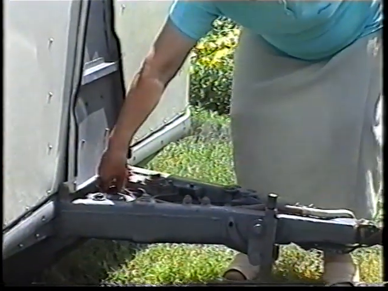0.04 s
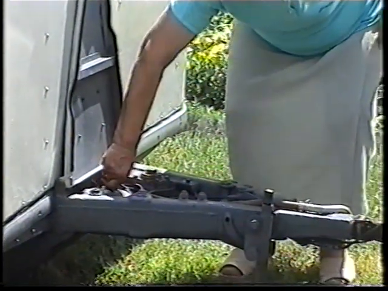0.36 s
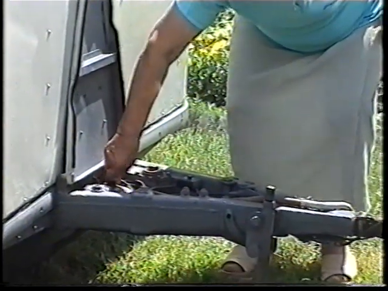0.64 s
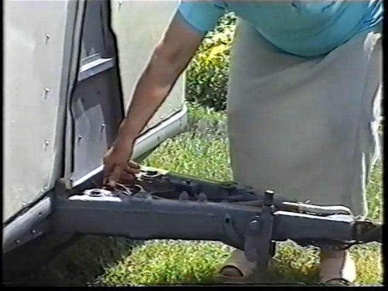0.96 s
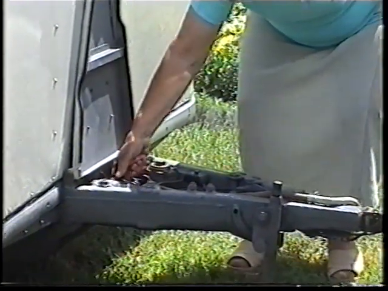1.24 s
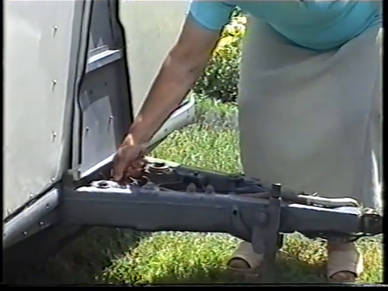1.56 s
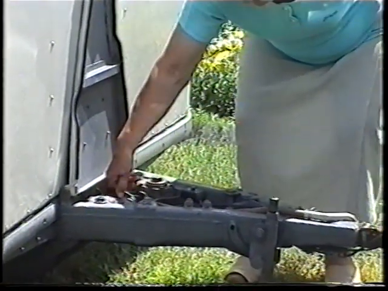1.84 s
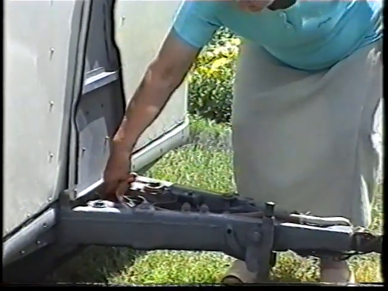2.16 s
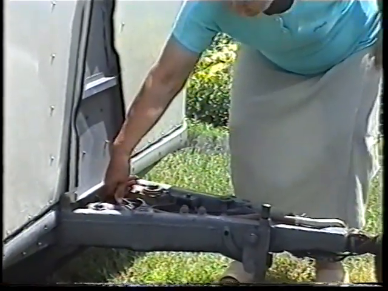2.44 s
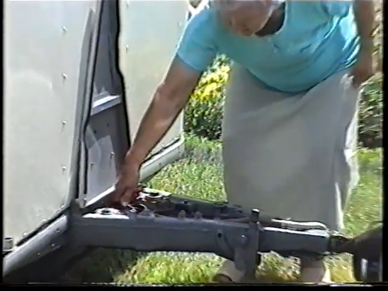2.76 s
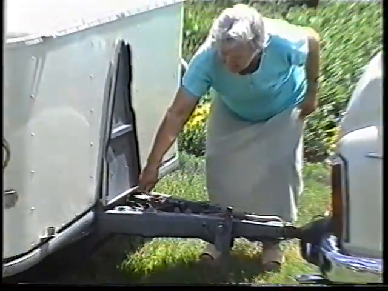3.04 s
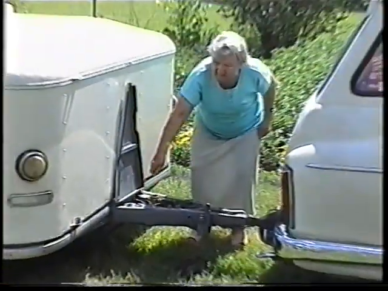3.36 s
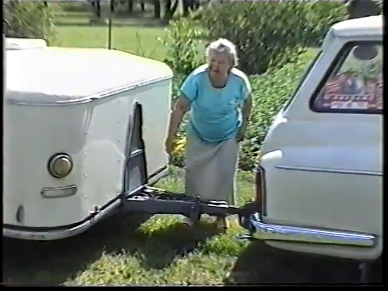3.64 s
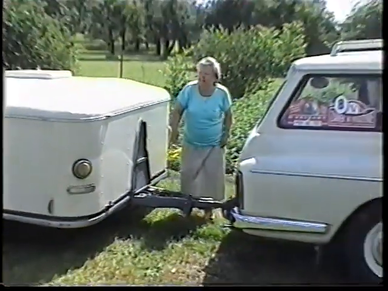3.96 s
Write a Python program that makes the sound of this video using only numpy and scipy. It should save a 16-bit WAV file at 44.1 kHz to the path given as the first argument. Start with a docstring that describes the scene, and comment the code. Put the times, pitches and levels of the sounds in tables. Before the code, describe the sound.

A small geared motor whirrs close by on a trailer's drawbar in a quiet garden. Before it starts, a metal latch snaps at 0.4 seconds, clacks lightly near 0.9 and snaps again at 2, while a distant songbird faintly whistles and trills. From about 2.1 seconds the motor scrapes and spins up, then runs with gear whine, chatter and a rubbing hiss, its pitch sagging slightly from 3 to 4.

```python
"""A garden, close to a trailer's drawbar. The latch snaps twice, with light clacks between;
then a small geared motor spins up and whirrs. Its gear teeth whine and chatter in the housing,
and something rubs once and twice a turn. Far from the microphone a songbird whistles and trills,
over quiet air and the faint hum of a tape camera."""
import sys
import numpy as np
from scipy import signal
from scipy.fft import rfft, irfft
from scipy.io import wavfile

SR = 44100
rng = np.random.default_rng(int(sys.argv[2]) if len(sys.argv) > 2 else 0)


def to_wav(s):
    """Save 16-bit WAV."""
    ch = np.atleast_2d(s).T  # columns
    pcm = np.round(np.clip(ch, -1, 1) * 32767)  # PCM
    wavfile.write(sys.argv[1], SR, pcm.astype(np.int16))


N = 176400
T = np.arange(N) / SR

# resonances of the motor housing: f/Hz, width/Hz, lift/dB
HOUSING = [(280.5, 14, 3), (452, 43, 3.5), (563, 46, 1.5), (663.5, 60, 6.5), (818.3, 23, 10),
           (976, 52, 7.5), (1101, 49, 7.5), (1475, 59, 5), (1606, 29, 4.5), (1702, 89, 8.5), (1835, 54, 8),
           (1885, 53, 2.5), (2185, 52, 4.5), (2520, 200, 2), (2717, 35, 5.5), (2964, 140, 7),
           (4043, 66, 10.5), (5210, 690, 10), (5590, 45, 7.5), (7020, 130, 2), (7440, 110, 2),
           (7700, 110, 3), (9320, 250, 10.5)]


def amp(db):
    """Decibels to gain."""
    return 10 ** (np.asarray(db) / 20)


def unit(x):
    """Scales to rms 1."""
    return x / np.sqrt(np.mean(x ** 2) + 1e-20)


def curve(table, column=1):
    """One column of a timed table, sample by sample."""
    rows = np.array(table)
    return np.interp(T, rows[:, 0], rows[:, column])


def read(points, hz):
    """Reads a spectrum on a log-frequency axis."""
    f, value = np.transpose(points)
    return np.interp(np.log(hz + 1), np.log(f), value)


def peaks(resonances, hz):
    """Lift in dB that resonances give at these frequencies."""
    return sum(db / (1 + (2 * (hz - f) / width) ** 2) for f, width, db in resonances)


def colour(x, spectrum, resonances=()):
    """Minimum-phase filter of unit energy: a broad spectrum with resonant peaks."""
    hz = np.fft.rfftfreq(4096, 1 / SR)
    log_gain = np.log(amp(read(spectrum, hz) + peaks(resonances, hz)))
    mirrored = np.r_[log_gain, log_gain[-2:0:-1]]
    taps = np.fft.ifft(np.exp(np.conj(signal.hilbert(mirrored)))).real
    return signal.fftconvolve(x, taps / np.linalg.norm(taps))[:len(x)]


def drift(hz):
    """Random motion of rms 1, up to about this rate."""
    lowpass = np.exp(-(np.fft.rfftfreq(N, 1 / SR) / hz) ** 2)
    return unit(irfft(rfft(rng.standard_normal(N)) * lowpass, N))


def stroke(start, length, t60, rise=0.0021):
    """Envelope: quick rise, hold, exponential release."""
    return np.clip((T - start) / rise, 0, 1) * amp(-60 * np.maximum(T - start - length, 0) / t60)


def grit(spread_db):
    """Noise clumped into tiny impacts."""
    return unit(rng.standard_normal(N) * amp(spread_db * drift(1050)))


def contacts(table, t60, spread_db):
    """Short gritty contacts between metal parts."""
    return grit(spread_db) * sum(amp(db) * stroke(start, length, t60) for start, length, db in table)


def air():
    """Quiet outdoor air all round the microphone, barely wavering."""
    # air spectrum: f/Hz, relative level/dB
    spectrum = [(25, -6.5), (50, -12), (85, -9), (142, -2.5), (202, -7.5), (475, -9.5), (749, -15),
                (1000, -9), (1760, -14.5), (3730, -17), (6720, -23), (15000, -31.5)]
    return unit(colour(rng.standard_normal(N), spectrum)) * amp(-57 + .5 * drift(3.7))


def camera_hum():
    """The tape camera's faint, steady tones, right at the microphone."""
    # hum tones: f/Hz, rms level/dB
    tones = [(900, -65), (1799, -73.5), (2522, -76.5), (15624, -72.5)]
    return sum(amp(db) * np.sqrt(2) * np.sin(2 * np.pi * hz * T + 0.17 * drift(5.4)) for hz, db in tones)


def garden_echo(x):
    """Scattered echoes from trailer, car and hedges; the treble dies first."""
    # echo decay: f/Hz, time to fall 63 dB/s
    decay = [(100, 0.66), (1000, 0.35), (4500, 0.38), (12000, 0.16)]
    reflections = rng.standard_normal(SR) * (rng.random(SR) < 2000 / SR)
    hz, t, bands = signal.stft(reflections, SR, nperseg=256)
    tail = signal.istft(bands * 0.00073 ** (t / read(decay, hz)[:, None]), SR, nperseg=256)[1]
    return signal.fftconvolve(x, tail / np.linalg.norm(tail))[:N]


def songbird():
    """Far off: pure gliding whistles that flatten at their end, and trills of quick upward sweeps."""
    # whistles: t/s, length/s, starting f/Hz, final f/Hz, relative level/dB
    whistles = [(0.053, 0.038, 5400, 6000, -59.5), (0.073, 0.076, 3250, 3740, -61.5),
                (0.16, 0.054, 3250, 4820, -60), (.368, .034, 5400, 6000, -71),
                (0.465, 0.073, 3250, 4720, -61.5), (0.692, 0.03, 5400, 6000, -66.5),
                (0.775, 0.058, 3200, 4840, -63), (1, .038, 5400, 6000, -70),
                (1.113, 0.038, 3200, 4620, -59.5), (1.247, .018, 6200, 4970, -61),
                (1.269, 0.02, 4800, 3240, -67), (1.366, 0.0157, 6200, 4860, -58.5),
                (1.38, .034, 4600, 3060, -63), (1.487, 0.016, 6100, 4800, -61.5),
                (1.504, .032, 4520, 3200, -58), (1.618, 0.024, 6100, 4960, -58.5),
                (1.631, 0.041, 4700, 3000, -60.5)]
    # trills: t/s, length/s, relative level/dB
    trills = [(0.208, .035, -57.5), (0.306, .05, -62), (1.785, 0.074, -57), (1.896, 0.064, -58.5),
              (2.05, .055, -62)]
    sweeps_per_s, sounding_share, low_hz, high_hz = 53, .6, 3150, 5900
    song = np.zeros(N)
    quiver = 1 + 0.0197 * drift(500)
    for start, length, from_hz, to_hz, db in whistles:
        progress = np.clip((T - start) / length, 0, 1)
        hz = (to_hz + (from_hz - to_hz) * (1 - progress) ** 1.3) * quiver
        envelope = np.sqrt(abs(np.sin(np.pi * progress)))
        song += amp(db) * envelope * np.sin(2 * np.pi * np.cumsum(hz) / SR)
    for start, length, db in trills:
        cycle = np.clip(T - start, 0, length) * sweeps_per_s % 1
        progress = np.minimum(cycle / sounding_share, 1)
        hz = (low_hz + (high_hz - low_hz) * progress) * quiver
        envelope = stroke(start, length, .005) * np.sin(np.pi * progress)
        song += amp(db) * envelope * np.sin(2 * np.pi * np.cumsum(hz) / SR)
    return song * amp(3 * drift(140))


def spring_rattle():
    """The latch spring rattles just after each snap."""
    # rattles: t/s, length/s, level/dB
    rattles = [(.457, 0.0084, -42.5), (.476, 0.024, -55), (2.014, 0.0092, -49), (2.027, 0.013, -46),
               (2.047, 0.0069, -52)]
    # spring spectrum: f/Hz, relative level/dB
    spectrum = [(200, 0), (900, 1.5), (2200, -6.5), (3200, -8), (5200, -6), (6500, -3.5), (8200, -8),
                (11000, -19), (16000, -32)]
    return colour(contacts(rattles, t60=0.044, spread_db=2.5), spectrum)


def clacks():
    """Metal parts knock lightly between the snaps."""
    # knocks: t/s, length/s, level/dB
    knocks = [(.843, 0.009, -42), (.861, .006, -46), (.898, .006, -48)]
    # clack spectrum: f/Hz, relative level/dB
    spectrum = [(200, -17), (600, -17), (800, 6.5), (1050, -4), (1250, -14), (1550, -1.5), (2000, -18),
                (2600, -10), (3500, -19), (5300, -21), (9000, -40), (16000, -32)]
    return colour(contacts(knocks, t60=0.056, spread_db=5), spectrum)


def latch():
    """Close by, each snap: a light touch, a grinding crack, ringing metal and the drawbar's low thud."""
    # snaps: t/s, sliding time/s, level/dB, treble lift/dB
    snaps = [(.4035, 0.0063, -24, -11.5), (1.9735, 0.0092, -25, -2)]
    # latch modes: f/Hz, t60/s, relative level/dB in the first snap and in the second
    modes = [(440, 0.14, -13, -22), (659, .12, -11, -12.5), (830, .15, -10, -9), (915, .08, -24, -7),
             (1045, 0.11, -42, -10), (1365, 0.092, -6.5, -3.5), (1585, 0.091, -6, -5),
             (1710, 0.09, -3.5, -16), (2170, 0.057, 0.5, -5.5), (2510, 0.047, -10, -18),
             (2870, 0.065, -7.5, -7), (5650, .05, -10, -10.5), (7500, 0.024, -25, -41)]
    # spectra of the latch's crack and the drawbar's thud: f/Hz, relative level/dB
    crack_spectrum = [(30, -17), (70, -13), (160, -8.5), (250, -5.5), (400, -7), (900, -14), (1500, -5.5),
                      (2600, -6.5), (3600, -8), (6000, -11.5), (11000, -10), (13000, -26), (16000, -27)]
    thud_spectrum = [(25, 2), (45, 2), (75, -25), (170, -22), (320, -15), (500, -18), (900, -24),
                     (3000, -69)]
    lead_s, crack_t60 = 0.0081, 0.052
    out = np.zeros(N)
    for k, (start, length, db, treble_db) in enumerate(snaps):
        touching = grit(3.4) * stroke(start - lead_s, lead_s, crack_t60)
        touch = colour(touching, crack_spectrum, [(2150, 1200, 16)])
        sliding = grit(0.73) * stroke(start, length, crack_t60)
        crack = colour(sliding, crack_spectrum, [(9000, 16000, treble_db)])
        ring = np.zeros(N)
        for hz, t60, *levels in modes:
            phase = 2 * np.pi * (hz * T + rng.random()) + 0.46 * drift(190)
            ring += amp(levels[k]) * stroke(start, length / 2, t60, rise=.004) * np.sin(phase)
        thud = colour(rng.standard_normal(N) * stroke(start, length, t60=.28), thud_spectrum)
        out += amp(db) * (amp(-10) * touch + amp(-1) * crack + ring + amp(-19.5) * thud)
    return out


def scrapes():
    """The motor's first slow turns scrape and ring in the housing."""
    # scrapes: t/s, length/s, level/dB
    events = [(2.089, 0.0099, -48.5), (2.155, 0.039, -48), (2.219, 0.018, -41.5), (2.282, 0.011, -39.5)]
    # scrape spectrum: f/Hz, relative level/dB
    spectrum = [(60, -5), (170, -4), (300, 1.5), (450, 1), (700, -6), (1250, -16), (2000, -24),
                (3500, -17.5), (5500, -16.5), (9600, -31), (11000, -38), (15000, -38)]
    return colour(contacts(events, t60=0.11, spread_db=4.0), spectrum, HOUSING)


def rubbing(once_db, twice_db, mesh_cycles):
    """Something rubs: a hiss swells twice a turn, a finer fizz once; both ripple with each tooth."""
    # spectra of the rubbing: f/Hz, relative level/dB
    hiss_spectrum = [(1000, -4.5), (2500, -13.5), (3500, 0.5), (4600, -3), (5500, -3), (6500, -4),
                     (8000, -13), (11000, -40)]
    fizz_spectrum = [(2000, -34), (5000, -9.5), (6800, 1.5), (8000, 1.5), (9700, -3), (10800, -12.5),
                     (15000, -22)]
    tooth_db = 0.4 * np.cos(2 * np.pi * mesh_cycles)
    hiss = colour(grit(1.3) * amp(0.73 * twice_db + tooth_db), hiss_spectrum, HOUSING)
    fizz = colour(grit(1.8) * amp(once_db + tooth_db), fizz_spectrum, HOUSING)
    return unit(hiss) + amp(-5) * unit(fizz)


def gear_chatter(once_db, mesh_cycles):
    """Uneven tooth impacts and grit knock in the housing, swelling slightly once a turn."""
    # chatter spectrum: f/Hz, relative level/dB
    spectrum = [(100, -23.5), (230, -17), (380, -12.5), (490, -11.5), (620, -1), (780, -1), (1000, -9),
                (1250, -14), (1800, -13.5), (2600, -14.5), (3500, -27.5), (6000, -70)]
    pulses = np.diff(np.floor(mesh_cycles), prepend=0)
    impacts = unit(pulses * amp(3.5 * rng.standard_normal(N)))
    knocks = (0.54 * impacts + grit(1.18)) * amp(.25 * once_db)
    return unit(colour(knocks, spectrum, HOUSING))


def gear_whine(shaft_hz, turns):
    """Wavering tones of the meshing gears, lifted as they pass through the housing's resonances."""
    # gear tones: multiple of the shaft rate, relative level/dB
    orders = [(11, -57), (12, -41), (13, -58.5), (17, -65), (20, -61), (21, -55), (23, -51), (24, -55.5),
              (25, -46.5), (35, -58), (36, -51.5), (37, -62), (48, -68)]
    start_s, rise_s = 2.345, 0.026
    whine = np.zeros(N)
    for order, db in orders:
        gain = amp(db + peaks(HOUSING, order * shaft_hz) + 1.4 * drift(8))
        whine += gain * np.sin(2 * np.pi * (order * turns + rng.random()))
    return whine * amp(-0.5) * np.clip((T - start_s) / rise_s, 0, 1)


def motor():
    """Close by, the motor scrapes into motion; whine, chatter and rubbing all follow one shaft."""
    # gear mesh rate: t/s, f/Hz
    mesh_rate = [(2.05, 150), (2.22, 190), (2.3, 247), (2.37, 272), (2.44, 295), (2.51, 313), (2.65, 326),
                 (2.75, 328), (2.86, 325), (3.0, 316), (3.07, 309), (3.14, 297), (3.21, 289), (3.36, 284),
                 (3.5, 279), (3.64, 275), (3.85, 273), (4.0, 269)]
    # motor loudness: t/s, relative chatter level/dB, rubbing hiss level/dB
    loudness = [(2.07, -60, -49), (2.096, -48, -57), (2.112, -55, -77), (2.166, -43.5, -51.5),
                (2.198, -48, -72), (2.23, -37.5, -51), (2.262, -43.5, -66), (2.29, -37, -40),
                (2.31, -32.5, -51), (2.328, -34, -47), (2.536, -34.5, -51.5), (3.284, -35, -47.5),
                (3.994, -33.5, -46.5), (4.0, -48, -52)]
    # swell of the fizz with each turn: t/s, depth/dB
    swell = [(2.3, 2.5), (3.0, 4.5), (3.3, 2.8), (4, 1.5)]
    teeth, flutter, start_s, rise_s = 12, .002, 2.07, 0.021
    shaft_hz = curve(mesh_rate) / teeth * (1 + flutter * drift(25))
    turns = np.cumsum(shaft_hz) / SR
    once_db = curve(swell) * np.cos(2 * np.pi * (turns - 0.79))
    twice_db = curve(swell) * np.cos(4 * np.pi * (turns - 0.3))
    whine = gear_whine(shaft_hz, turns)
    chatter = gear_chatter(once_db, teeth * turns) * amp(curve(loudness) - 1)
    rub = rubbing(once_db, twice_db, teeth * turns) * amp(curve(loudness, column=2))
    running = np.clip((T - start_s) / rise_s, 0, 1)
    return whine + (chatter + rub) * running + scrapes()


def scene():
    """One microphone: the drawbar near and almost dry, the bird far off with more echo."""
    near = spring_rattle() + latch() + clacks() + motor()
    far = songbird()
    echo = garden_echo(amp(-16) * near + amp(-4) * far)
    return (near + amp(6.5) * far + echo + air() + camera_hum())[None]


def record(dry):
    """A steep low-pass cuts off the highest treble."""
    edge_hz = 15850
    lowpass = signal.firwin(1023, edge_hz, window=("kaiser", 9), fs=SR)
    return signal.oaconvolve(dry, lowpass[None], "same")


dry = scene()
out = record(dry)
to_wav(out)
```